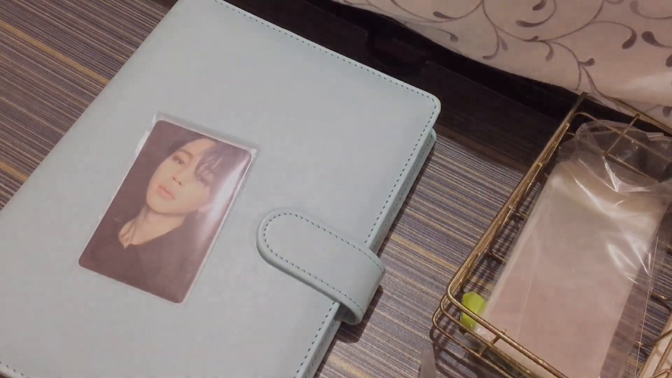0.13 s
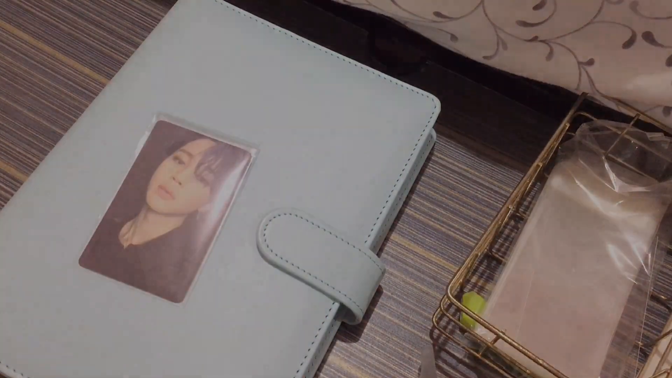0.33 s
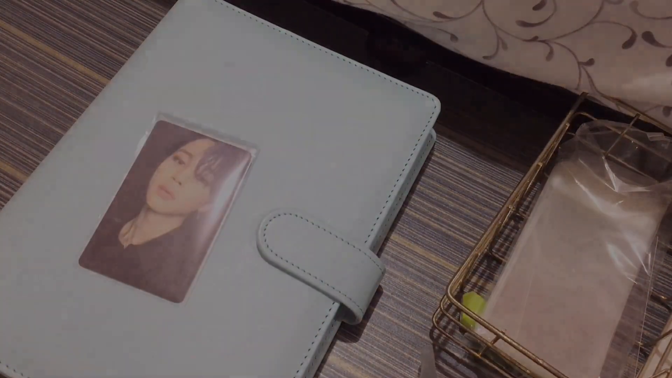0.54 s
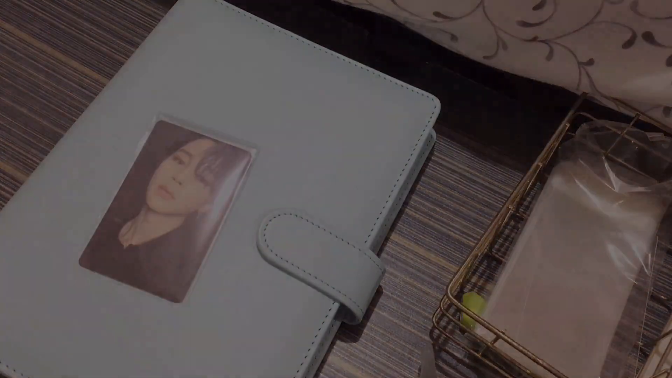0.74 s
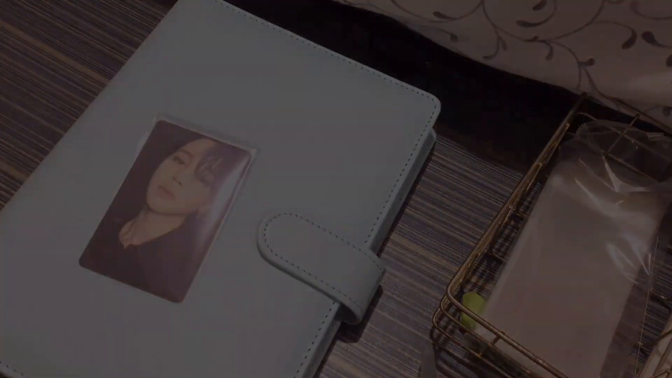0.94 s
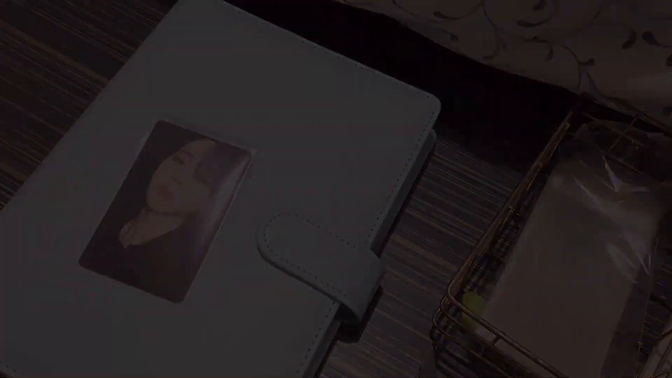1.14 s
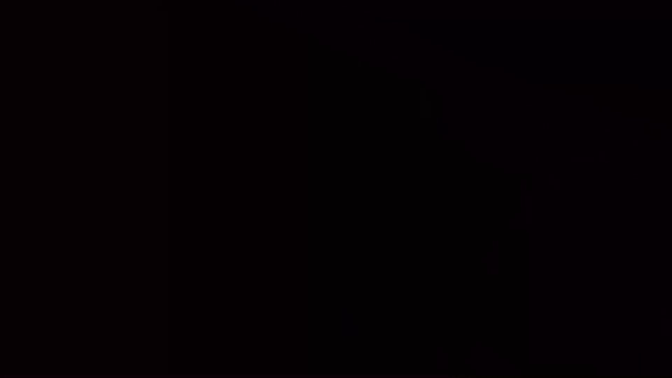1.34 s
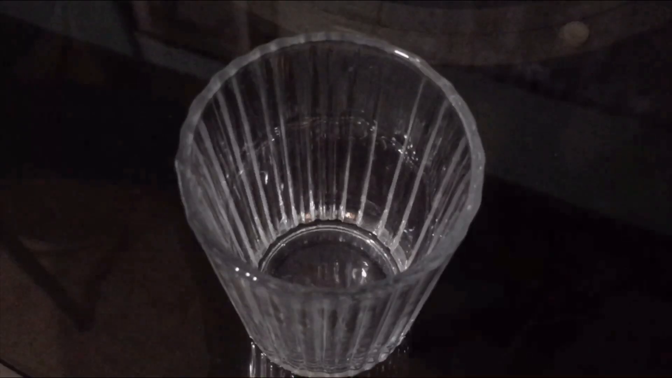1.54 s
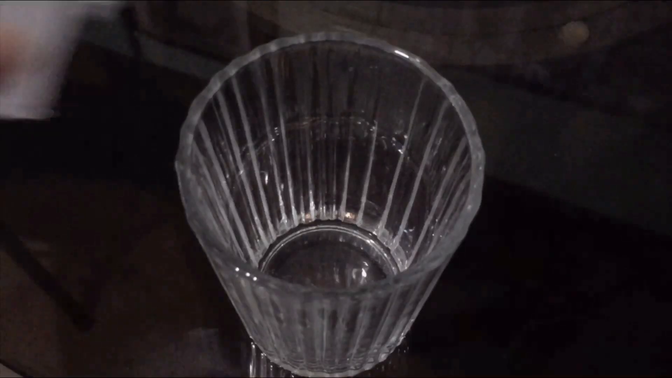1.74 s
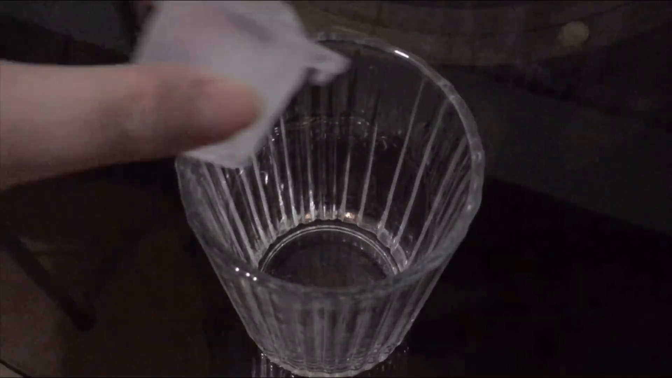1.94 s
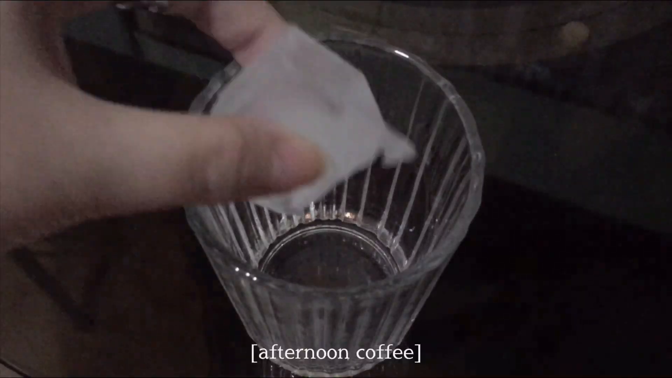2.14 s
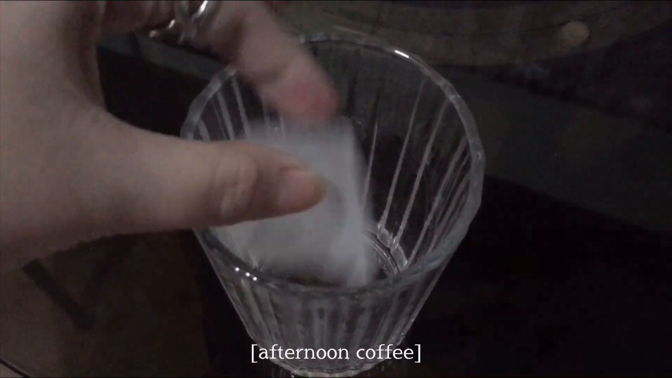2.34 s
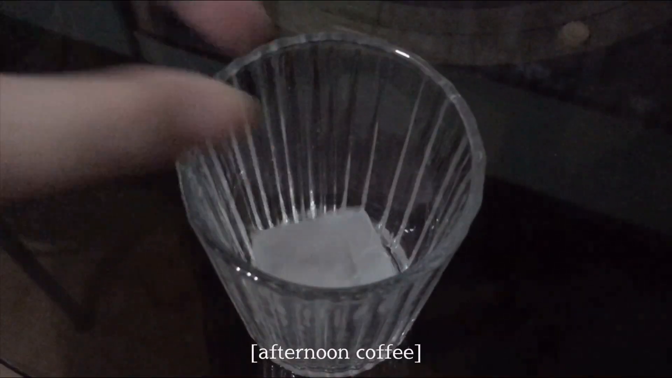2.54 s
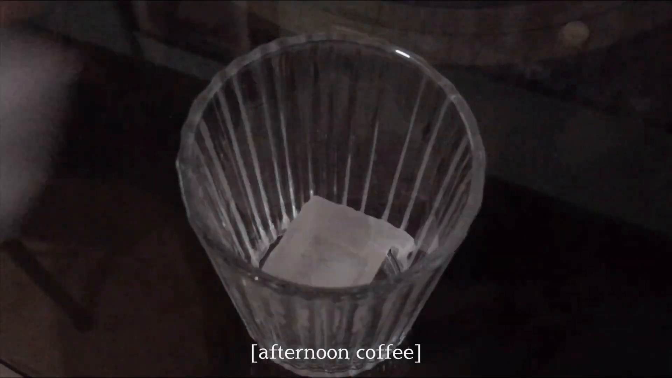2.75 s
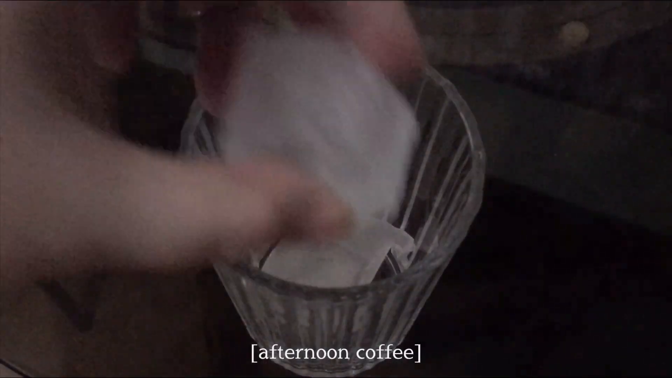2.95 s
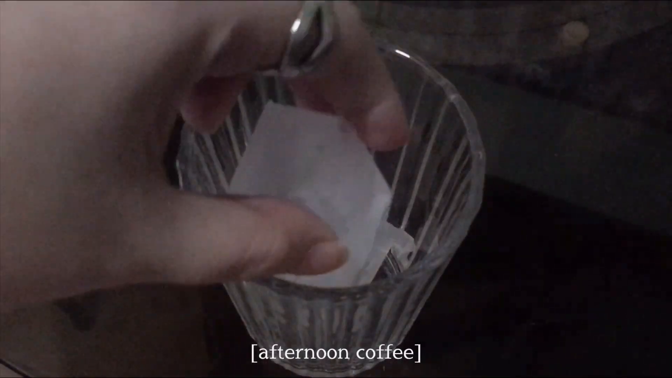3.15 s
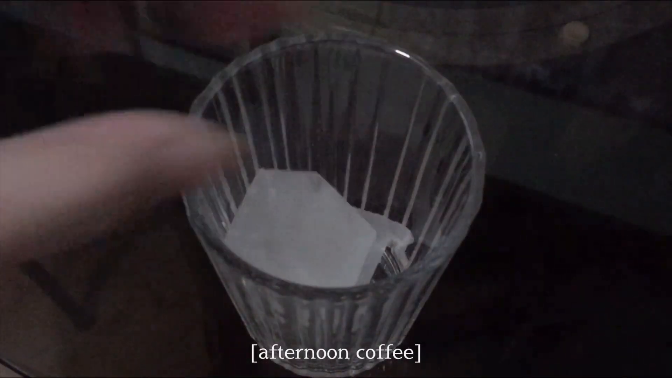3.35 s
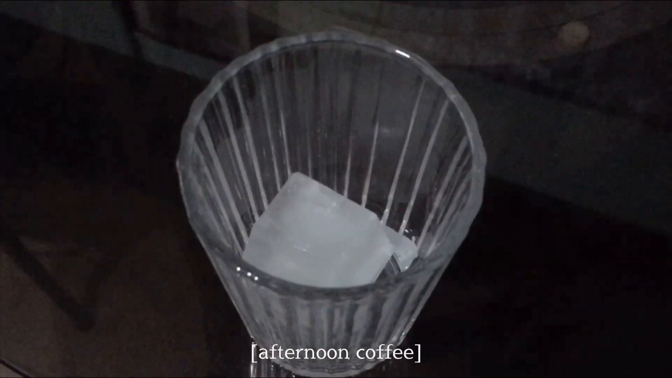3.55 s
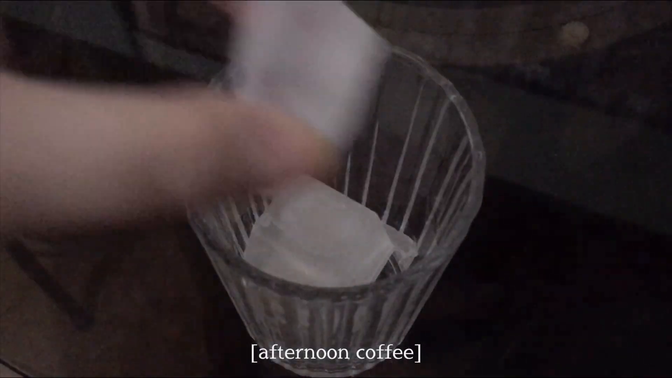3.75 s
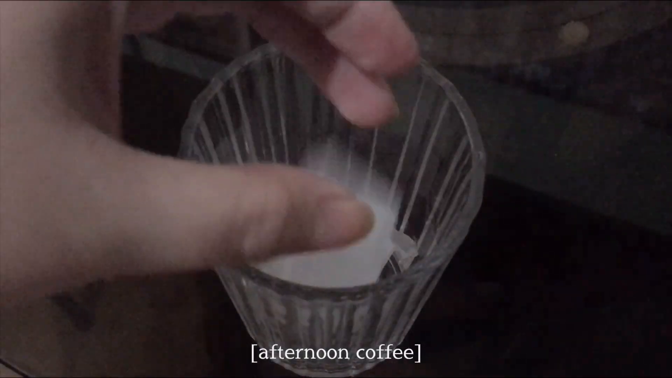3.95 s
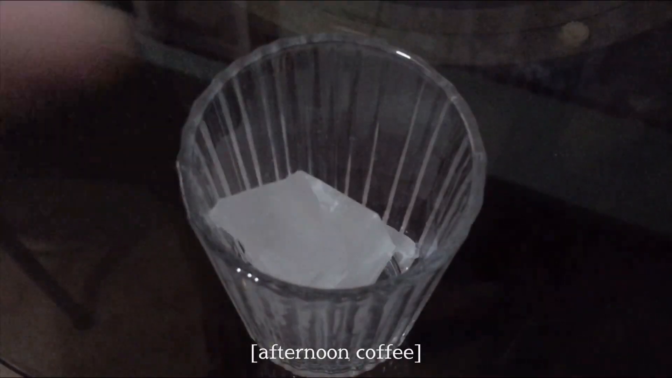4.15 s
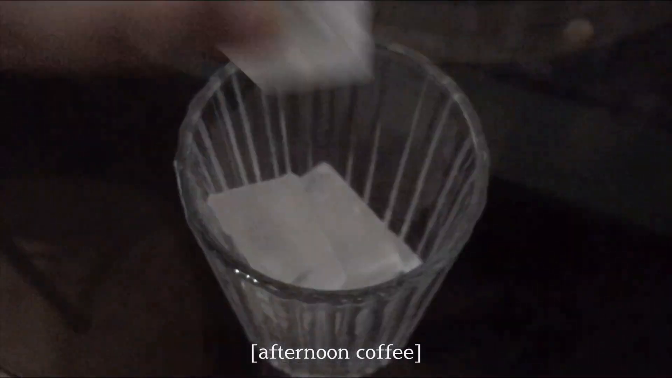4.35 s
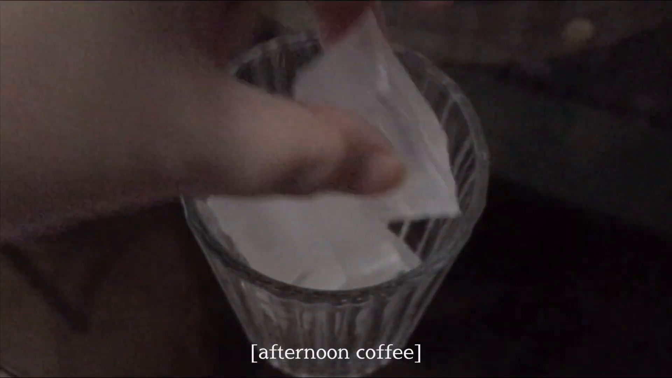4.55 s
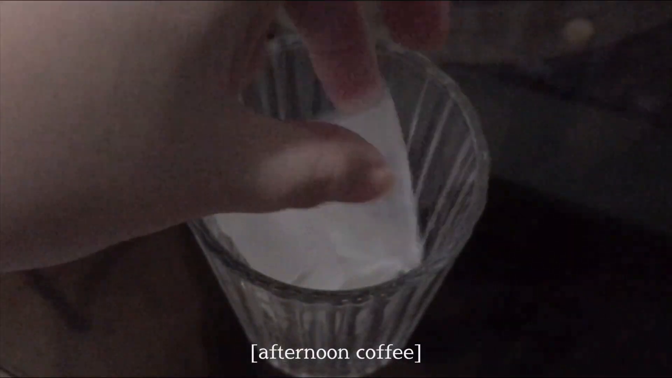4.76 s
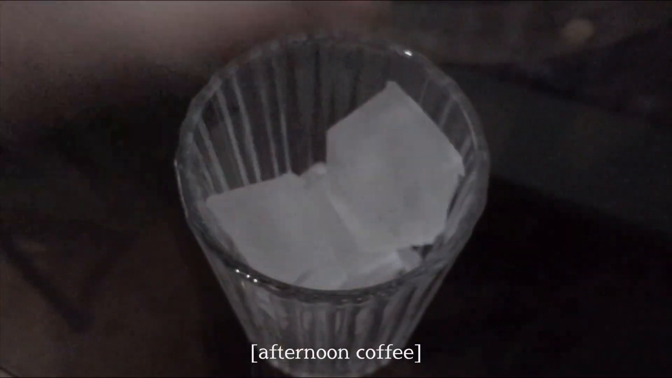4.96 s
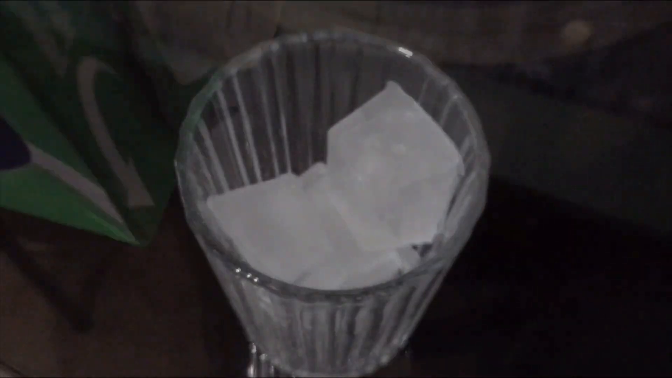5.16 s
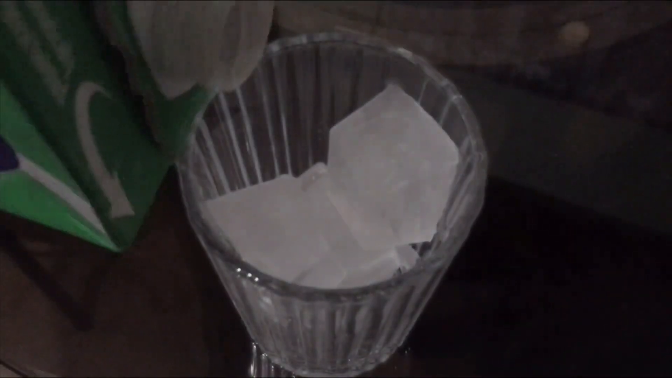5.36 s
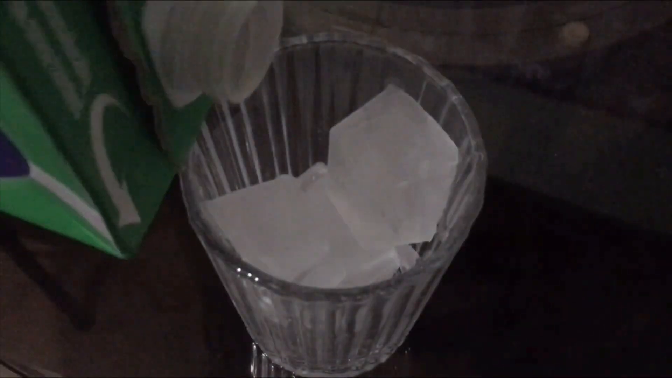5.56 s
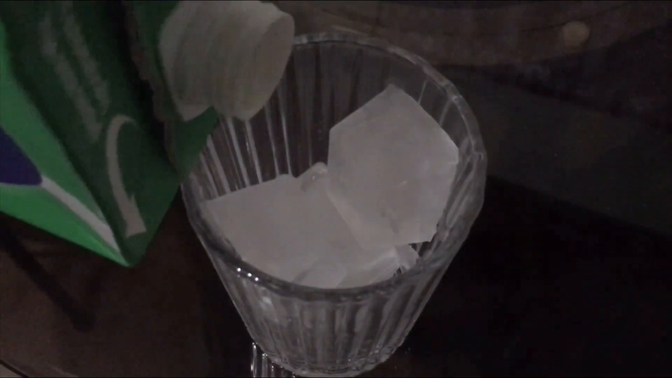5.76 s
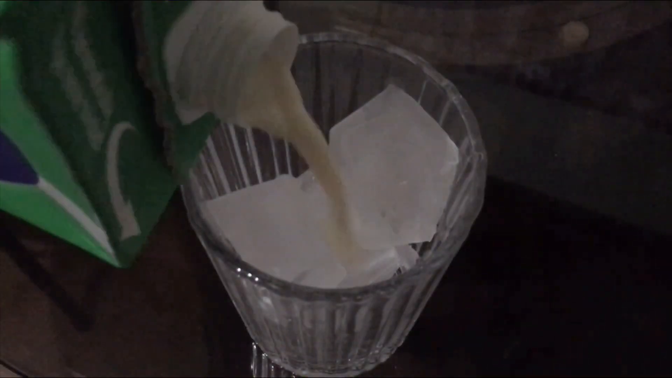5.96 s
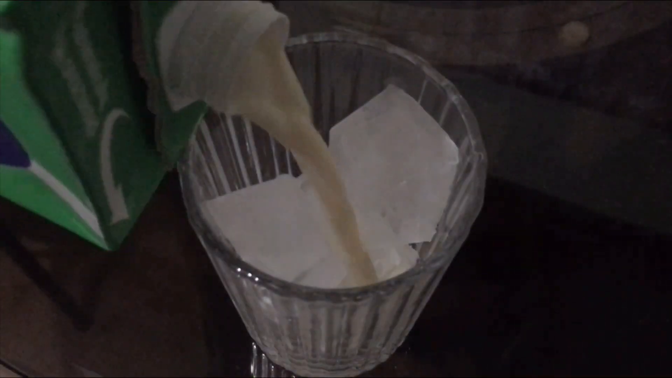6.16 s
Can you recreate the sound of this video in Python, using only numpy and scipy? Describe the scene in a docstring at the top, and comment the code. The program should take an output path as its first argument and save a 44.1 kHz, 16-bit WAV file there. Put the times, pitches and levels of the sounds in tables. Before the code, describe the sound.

After a brief plastic rustle and click, ice cubes clink one by one into a ribbed glass, rattling to rest in a quiet room.

```python
"""Ice into a ribbed glass

Ice cubes go one by one into a drinking glass on a table, close to the microphone in a small quiet room.
Each contact is a noise crack with damped modes of glass and table; landings rebound and rattle to rest.
A short plastic rustle (shaped noise) comes first, squeaks glide between, a carton ticks at the end.
Rumble, drone and hiss lie behind. Several shots are spliced: at each splice the sound stops for a moment.
"""
import sys
import numpy as np
from scipy import signal
from scipy.fft import rfft, irfft, next_fast_len
from scipy.io import wavfile
from scipy.ndimage import uniform_filter1d

SR = 44100
rng = np.random.default_rng(int(sys.argv[2]) if len(sys.argv) > 2 else 0)


def dump_mix(stems):
    """Bounce the given channels to the path in sys.argv[1] as a 16-bit WAV at rate SR."""
    frames = np.atleast_2d(stems).T  # one column per channel
    limited = np.clip(frames, -1, 1)  # hard clip at full scale
    pcm = np.round(limited * 32767).astype(np.int16)
    wavfile.write(sys.argv[1], SR, pcm)


N = 273420
CLOCK = np.arange(N) / SR  # s, the whole scene
AGE = np.arange(SR // 2) / SR  # s, since the start of one short sound

# All table levels are relative: the sources add their own trims.
# the shots: start t/s, end t/s
SHOT_TIMES = [(0, 1.353), (1.389, 2.705), (2.716, 3.612), (3.624, 4.349), (4.356, 6.2)]
# a cube drops onto the bottom or onto other cubes: t/s, strength level/dB, crack level/dB, wall ring level/dB,
# brightness/dB, rim level/dB, thud level/dB, loss per rebound/dB; crack, ring, rim, thud relative to strength
LANDING_EVENTS = [(2.4339, -19.5, 2.5, -1, -16.5, -35, -15, 5), (2.4886, -24, 5, -2.5, -12, -22, -29, 6),
                  (3.3096, -23.5, 9.5, -7, -9.5, -35, -6.5, 16),
                  (3.5066, -23, 5.5, -6.5, -6, -34, -20.5, 12.5),
                  (4.0205, -21, -5.5, 3.5, 5, -11, -16.5, 5.5), (4.797, -21.5, 10, -4, 1.5, -10, -13, 18)]
# a cube touches the wall or shifts: t/s, strength level/dB, crack level/dB, rim level/dB (last two rel. strength)
TAP_EVENTS = [(1.9311, -31, -27, -31), (2.065, -35, -4.5, -11), (2.0681, -33, -21.5, -38),
              (2.0917, -37.5, -23.5, -39), (2.106, -43.5, -19.5, -37), (2.147, -41.5, -18, -28),
              (2.2573, -35, -4.5, -14.5), (2.309, -45, -14, -20.5), (2.3936, -37, 3, 4.5),
              (2.403, -40.5, -4, -22), (2.584, -37.5, 3.5, -35), (2.655, -43.5, 1.5, -37),
              (3.413, -47, 7, -33), (3.4554, -34.5, -3.5, -25), (3.5037, -30, 8, -32),
              (3.9934, -29, -4, -7), (4.0132, -28, 12, -30), (4.134, -38, 4, -2.5), (4.1406, -37, -3, -18),
              (4.161, -46.5, -3.5, -25), (4.1788, -39, -4, -18), (4.619, -42.5, -7.5, -1.5),
              (4.6353, -35, -17.5, -43), (4.658, -43, -7, -14.5), (4.7159, -30.5, -28.5, -33),
              (4.9096, -34.5, -2, -2.5)]
# bending modes of the glass wall: f/Hz, level/dB, t60/s
WALL_MODES = [(1443, -2, .21), (1750, -4, .14), (2255, 1, .13), (2403, -2, .12), (2787, -1, .14),
              (2812, -9, .19), (3382, -3, .13), (3424, -11, .18), (4025, -6, .19), (4731, -12, .2),
              (5050, -17, .18), (5465, -6, .16), (6039, -4, .14), (6261, -22, .3), (7093, -22, .24),
              (7968, -27, .22), (8888, -26, .2)]
# short bright modes of a tap near the rim: f/Hz, level/dB, t60/s
RIM_MODES = [(3424, -11, .13), (6040, -5, .065), (10120, -17, .09), (10930, 0, .06), (11010, -3, .055)]
# crowded weak modes of glass and ice: f/Hz, level/dB
SHIMMER_LEVELS = [(2500, 7), (5300, -2), (7000, -17.5), (11000, -16), (15000, -25.5)]
# the glass chattering on the table top: f/Hz, level/dB, t60/s
CHATTER_MODES = [(598, -13, .27), (685, -15, .18), (860, -8, .15), (905, -7, .13), (1050, -3, .12),
                 (1270, -10, .17), (1615, 0, .1), (1690, -3, .09), (1910, -4, .12), (1975, -1, .09),
                 (2100, -3, .08), (2620, -7, .1), (2990, -10, .11)]
# the whole table: f/Hz, level/dB, t60/s
THUD_MODES = [(154.2, -3, 0.16), (179, -3, 0.076), (225.3, -15, 0.14)]
# noise spectrum of the glass base on the table: f/Hz, level per Hz/dB
CLATTER_COLOUR = [(100, -28), (300, -13), (500, -2), (800, 2), (1700, 3.5), (2300, 12.5), (3200, -20.5),
                  (4500, -37), (7000, -29.5), (16000, -46)]
# noise spectrum of the ice crack: f/Hz, level per Hz/dB
CRACK_COLOUR = [(300, -17), (1500, -7), (3500, 2.5), (5300, 2.5), (6800, -10), (10000, -15.5),
                (16000, -36.5)]
# a cube slips to the bottom: t/s, level/dB, hollow ring level/dB
KNOCK_EVENTS = [(3.558, -2.5, -3)]
# noise spectrum of that knock: f/Hz, level per Hz/dB
KNOCK_SPECTRUM = [(100, -59), (260, -3.5), (380, -36.5), (500, -11.5), (1020, -0.5), (1500, -5.5),
                  (2700, -7.5), (3300, -13), (8900, -22.5), (16000, -34.5)]
# hollow ring of that knock: f/Hz, level/dB, t60/s
HOLLOW_MODES = [(516, -3, 0.1), (993, 5.5, 0.184), (1080, 4, 0.088), (1123, 3.5, 0.14), (1566, -37, .05)]
# things being handled: peak t/s, level/dB, rise/s, t60/s
RUSTLE_STROKES = [(1.391, -40, .003, .32), (4.38, -51, 0.12, 0.98), (5.15, -52.5, 0.049, 0.073),
                  (5.2, -60.5, 1.7, 0.83), (5.42, -55.5, 1.2, 0.34), (5.735, -56, .03, 0.059)]
# noise spectrum of the rustle, also weighting the squeak overtones: f/Hz, level per Hz/dB
RUSTLE_SPECTRUM = [(200, -4), (450, -11.5), (950, -3.5), (1600, -2), (3200, -11.5), (16000, -30)]
# small plastic clicks: t/s, level/dB
CLICK_EVENTS = [(1.4264, -16), (5.388, -31.5), (6.0655, -40), (6.107, -39)]
# noise spectrum of a click: f/Hz, level per Hz/dB
CLICK_SPECTRUM = [(1000, -21), (3000, -3.5), (5300, 1), (7800, -2), (10600, -11), (14000, -6),
                  (16000, -18.5)]
# wet ice in the fingers, then the carton: t/s, length/s, f/Hz, glide/(Hz per s), level before the arch/dB
SQUEAK_EVENTS = [(4.384, 0.025, 1140, -900, -47), (4.413, 0.12, 1040, -1500, -50.5),
                 (5.442, 0.076, 4060, 201, -56.5)]
# faint tones in the second shot: f/Hz, level/dB, both centres of a slow waver
HUM_TONES = [(174, -50.5), (345, -64), (1995, -66.5)]
# noise spectrum of the whirr in the third shot: f/Hz, level per Hz/dB
WHIRR_COLOUR = [(750, -19), (1080, 1.5), (1500, -45.5)]
# course of the room air: t/s, rumble level/dB, drone level/dB
AIR_LEVELS = [(0, -55.5, -82), (1.35, -57.5, -63.5), (1.5, -55.5, -54.5), (4.9, -57.5, -52.5),
              (5.18, -49.5, -48.5), (5.6, -53.5, -53.5), (6.2, -58, -52)]
# noise spectrum of the room rumble: f/Hz, level per Hz/dB
RUMBLE_COLOUR = [(20, -20), (38, -0.5), (62, 1), (125, -14), (250, -17.5), (400, -25.5), (600, -55)]
# noise spectrum of the soft drone: f/Hz, level per Hz/dB
DRONE_COLOUR = [(90, -25.5), (140, -4.5), (172, 1), (210, -7), (280, -9.5), (400, -19), (600, -41.5)]
# noise spectrum of the hiss: f/Hz, level per Hz/dB
HISS_COLOUR = [(100, -10.5), (500, 3.5), (1100, 6), (2200, 2), (3500, -3.5), (7000, -9.5), (10000, -14.5),
               (13000, -19), (16000, -27)]
# noise spectrum of the high microphone hiss: f/Hz, level per Hz/dB
FIZZ_COLOUR = [(6000, -33), (7600, -19.5), (8800, -7), (9700, -14), (10500, -5), (11200, 1.5),
               (11700, -7.5), (12300, -38.5), (15000, -39)]
# decay of the small room: f/Hz, t60/s
ROOM_DECAY = [(150, 0.97), (1000, 0.38), (4000, 0.15), (12000, 0.16)]

REBOUNDS = 3
FLIGHT_S, FLIGHT_SHRINK = .019, .9  # first flight after a landing; each flight over the one before
FLIGHT_SCATTER = .18  # a tumbling cube's flights are uneven (log-normal spread)
REBOUND_SOFTER_DB = 1.5  # crack, brightness, rim ping and thud lose this much more at each rebound
TAP_THUD_DB, TAP_WALL_DB = -21.5, -16  # a tap hardly shakes the table or rings the wall
TAP_BRIGHT_DB, BRIGHT_PER_RIM = 2.5, 0.32  # the nearer a tap is to the rim, the stronger the upper wall modes
SQUEAK_JITTER, SQUEAK_FALL_DB = .02, 9  # share of the pitch; loss from one overtone to the next
TOP_HZ = 16700  # band limit of the recorder


def ice():
    """Each contact cracks, rings the glass and, a moment later, shakes the table under it."""
    out = np.zeros(N)
    weak_modes = crowd(SHIMMER_LEVELS, t60=.14, count=120)
    shimmer = amp(-4.5) * ring(weak_modes, scatter_db=3, attack=.0012)
    for s, crack_db, clatter_db, wall_db, bright_db, rim_db, thud_db in contacts():
        crack = amp(crack_db - 9) * unit_hit(burst(CRACK_COLOUR, t60=.011, attack=.00023))
        # the base of the glass raps once, then chatters on in the table's modes
        rap = amp(-2) * unit_hit(burst(CLATTER_COLOUR, t60=.024, attack=.002))
        chatter = amp(-7) * unit_hit(burst(CLATTER_COLOUR, t60=.1, attack=.003))
        table = amp(-2.5) * ring(CHATTER_MODES, scatter_db=4.5, attack=.0046)
        clatter = amp(clatter_db) * (rap + chatter + table)
        wall_modes = brightened(WALL_MODES, bright_db)
        wall = amp(4) * ring(wall_modes, scatter_db=4.5, attack=.0014)
        glass = amp(wall_db) * (wall + shimmer)
        rim = amp(rim_db + 0.5) * ring(RIM_MODES, scatter_db=6, attack=.0011)
        thud = amp(thud_db - 0.5) * ring(THUD_MODES, scatter_db=2.5, attack=.0065)
        add(out, s, in_room(crack + clatter + glass + rim + thud, wet_db=-19.5))
    return out


def contacts():
    """A tap is one contact; a landing rebounds ever weaker and duller, its flights tending to shorten."""
    for s, db, crack_db, wall_db, bright_db, rim_db, thud_db, loss_db in LANDING_EVENTS:
        for k in range(REBOUNDS + 1):
            soft_db = k * REBOUND_SOFTER_DB
            yield contact(s, db - k * loss_db, crack_db - soft_db, wall_db,
                          bright_db - soft_db, rim_db - soft_db, thud_db - soft_db)
            unevenness = np.exp(FLIGHT_SCATTER * rng.standard_normal())
            s = s + FLIGHT_S * FLIGHT_SHRINK ** k * unevenness
    for s, db, crack_db, rim_db in TAP_EVENTS:
        bright_db = TAP_BRIGHT_DB + BRIGHT_PER_RIM * rim_db
        yield contact(s, db, crack_db, TAP_WALL_DB, bright_db, rim_db, TAP_THUD_DB)


def contact(s, db, crack_db, wall_db, bright_db, rim_db, thud_db):
    """One meeting of ice and glass: t/s, then crack, clatter, wall, brightness, rim and thud in dB."""
    return s, db + crack_db, db, db + wall_db, bright_db, db + rim_db, db + thud_db


def brightened(modes, db):
    """A hard contact high on the wall brings out the upper modes, in full from 6 kHz."""
    tilt = [(5200, 0), (6000, 1)]  # f/Hz, share of the boost
    return [(hz, level + db * along(tilt, hz), t60) for hz, level, t60 in modes]


def crowd(colour, t60, count):
    """Many weak modes, irregularly spaced, at the levels of a spectrum."""
    edges = np.linspace(colour[0][0], colour[-1][0], count + 1)
    return [(hz, along(colour, hz), t60) for hz in rng.uniform(edges[:-1], edges[1:])]


def knock():
    """A wedged cube gives way and lands with a dull, hollow knock: a noise crunch over damped modes."""
    out = np.zeros(N)
    for s, db, hollow_db in KNOCK_EVENTS:
        crunch = unit_hit(burst(KNOCK_SPECTRUM, t60=.056, attack=.0041))
        hollow = amp(hollow_db - 0.5) * ring(HOLLOW_MODES, scatter_db=0, attack=.0026)
        add(out, s, in_room(amp(db - 14.5) * (crunch + hollow), wet_db=-14))
    return out


def handling():
    """Plastic and card rustle in uneven grains and give a few sharp clicks."""
    strokes = sum(amp(db) * swell(s, rise, t60) for s, db, rise, t60 in RUSTLE_STROKES)
    grains = amp(2.7 * waver(size=90))
    out = strokes * unit(noise(RUSTLE_SPECTRUM, N) * grains)
    for s, db in CLICK_EVENTS:
        click = amp(db - 10) * burst(CLICK_SPECTRUM, t60=.027, attack=.00062)
        add(out, s, in_room(click, wet_db=-12))
    return out


def squeak(s, length, hz, glide_hz_per_s, db):
    """A faint stick-slip tone with an unsteady pitch; it glides, swelling and fading in one arch."""
    age = np.clip(CLOCK - s, 0, length)
    pitch = (hz + glide_hz_per_s * age) * (1 + SQUEAK_JITTER * waver(size=30))
    phase = 2 * np.pi * np.cumsum(pitch) / SR
    tone = 0
    for k in range(1, 4):
        partial_db = along(RUSTLE_SPECTRUM, k * hz) - k * SQUEAK_FALL_DB
        tone = tone + amp(partial_db) * np.sin(k * phase)
    arch = np.sin(np.pi * age / length)
    return amp(db) * arch * unit(tone)


def hum():
    """A low hum with a thin whine: sines wavering in pitch and level through the second shot."""
    tones = np.zeros(N)
    for hz, db in HUM_TONES:
        gain = amp(db + 1.4 * waver(size=2500))
        pitch = hz + 5 * waver(size=1500)
        tones += gain * np.sin(2 * np.pi * np.cumsum(pitch) / SR)
    return tones * during(SHOT_TIMES[1])


def whirr():
    """A soft whirr, a faint band of noise, fills the third shot."""
    return amp(-62) * noise(WHIRR_COLOUR, N) * during(SHOT_TIMES[2])


def background():
    """Low room rumble, a soft drone and hiss, all shaped noise; high hiss joins from the second shot on."""
    rumble_db, drone_db = curves(AIR_LEVELS)
    rumble = amp(rumble_db + 4) * noise(RUMBLE_COLOUR, N)
    drone = amp(drone_db - 2.5) * noise(DRONE_COLOUR, N)
    hiss = amp(-61.5) * noise(HISS_COLOUR, N)
    fizz = amp(-65.5) * noise(FIZZ_COLOUR, N) * (CLOCK > SHOT_TIMES[1][0])
    return rumble + drone + hiss + fizz


def amp(db):
    """Decibels to gain."""
    return 10 ** (np.asarray(db) / 20)


def unit(x):
    """Scale to rms 1."""
    return x / np.sqrt(np.mean(x ** 2) + 1e-20)


def unit_hit(x):
    """Scale to rms 1 over the first 20 ms."""
    return x / np.sqrt(np.mean(x[:SR // 50] ** 2) + 1e-20)


def along(points, hz):
    """(f/Hz, value) points read on a log frequency axis."""
    f, v = np.transpose(points)
    return np.interp(np.log(hz + 1), np.log(f + 1), v)


def curves(rows):
    """One value per sample for each column after the time."""
    s, *cols = np.transpose(rows)
    return [np.interp(CLOCK, s, c) for c in cols]


def noise(colour, size):
    """Noise of rms 1 with the given spectrum."""
    m = next_fast_len(size)
    gain = amp(along(colour, np.fft.rfftfreq(m, 1 / SR)))
    return unit(irfft(rfft(rng.standard_normal(m)) * gain, m)[:size])


def fade(t, t60):
    """Exponential decay, 60 dB down after t60."""
    return 1000 ** (-t / t60)


def swell(s, rise, t60):
    """An envelope that grows by 60 dB over the rise, peaks at time s and dies away."""
    return fade(np.maximum(s - CLOCK, 0), rise) * fade(np.maximum(CLOCK - s, 0), t60)


def waver(size):
    """A random curve of rms 1 that changes over size samples."""
    return unit(uniform_filter1d(rng.standard_normal(N), size=size))


def burst(colour, t60, attack):
    """A dense cloud of resonances, made as shaped noise, that swells and dies."""
    return noise(colour, len(AGE)) * fade(AGE, t60) * (1 - np.exp(-AGE / attack))


def ring(modes, scatter_db, attack):
    """Damped modes; their strengths change with the spot that is struck."""
    hz, db, t60 = np.transpose(modes)[:, :, None]  # one row per mode
    gain = amp(db + scatter_db * rng.standard_normal(hz.shape))
    phase = 2 * np.pi * (hz * AGE + rng.random(hz.shape))
    waves = gain * fade(AGE, t60) * np.sin(phase)
    return unit_hit(waves.sum(axis=0) * (1 - np.exp(-AGE / attack)))


def in_room(sound, wet_db):
    """A sound with the short tail of the room: noise whose decay depends on frequency."""
    hz, t, z = signal.stft(rng.standard_normal(len(AGE)), SR, nperseg=256)
    decay = fade(t, along(ROOM_DECAY, hz)[:, None])
    tail = signal.istft(z * decay, SR, nperseg=256)[1]
    wet = signal.fftconvolve(sound, tail / np.linalg.norm(tail))[:len(sound)]
    return sound + amp(wet_db) * wet


def add(track, s, sound):
    """Mix a sound in at time s, cut at the next end of a shot."""
    end = min(stop for start, stop in SHOT_TIMES if stop > s)
    part = track[round(s * SR):round(end * SR)][:len(sound)]
    part += sound[:len(part)]


def during(shot):
    """True while a shot runs."""
    start, stop = shot
    return (CLOCK >= start) & (CLOCK < stop)


def scene():
    """All sources, silent between the shots."""
    running = sum(during(shot) for shot in SHOT_TIMES)
    squeaks = sum(squeak(*row) for row in SQUEAK_EVENTS)
    mix = ice() + knock() + handling() + squeaks + hum() + whirr() + background()
    return (running * mix)[None]


def record(dry):
    """The recorder rounds off the highest peaks and keeps nothing above its band limit."""
    held = dry / (1 + np.abs(dry / .8) ** 6) ** (1 / 6)
    m = next_fast_len(N + SR // 2)
    passed = np.fft.rfftfreq(m, 1 / SR) < TOP_HZ
    return irfft(rfft(held, m) * passed, m)[..., :N]


dry = scene()
out = record(dry)
dump_mix(out)
```